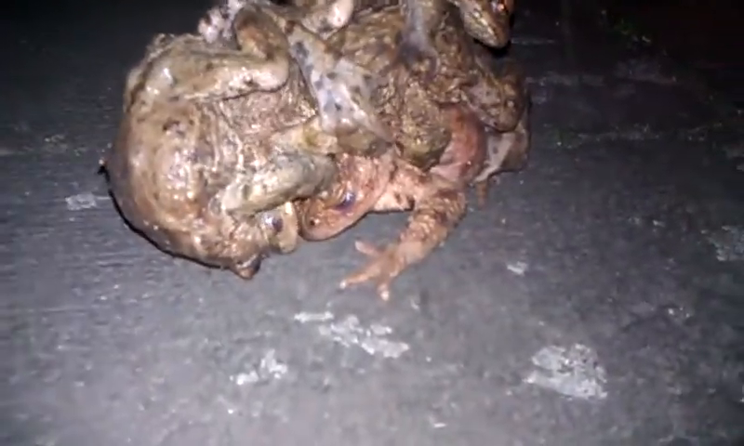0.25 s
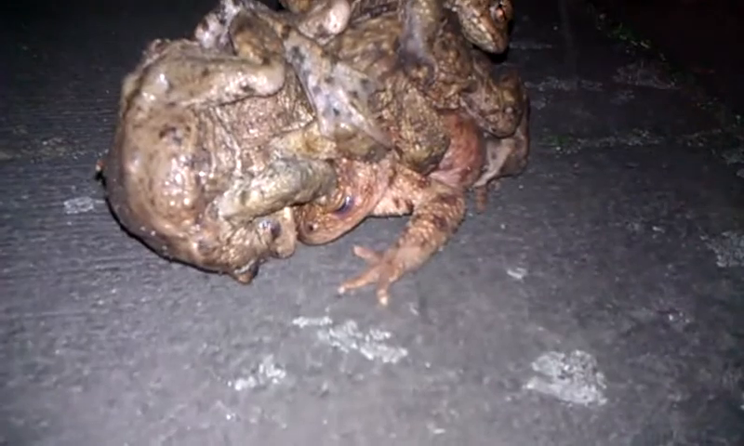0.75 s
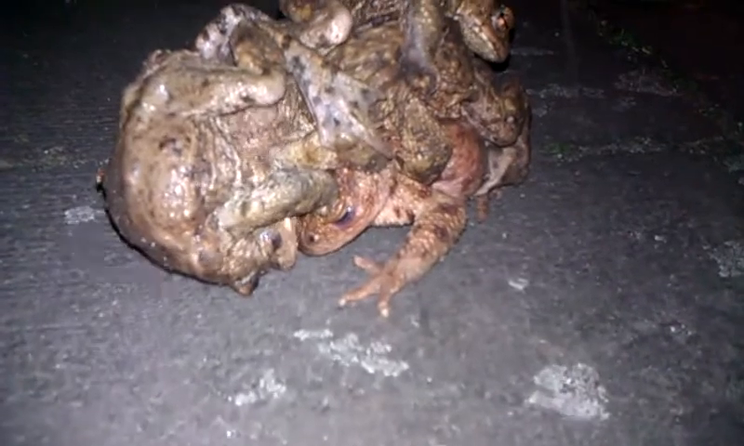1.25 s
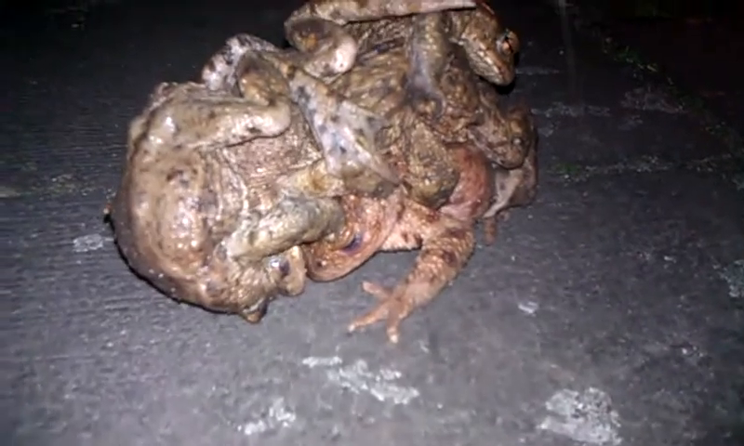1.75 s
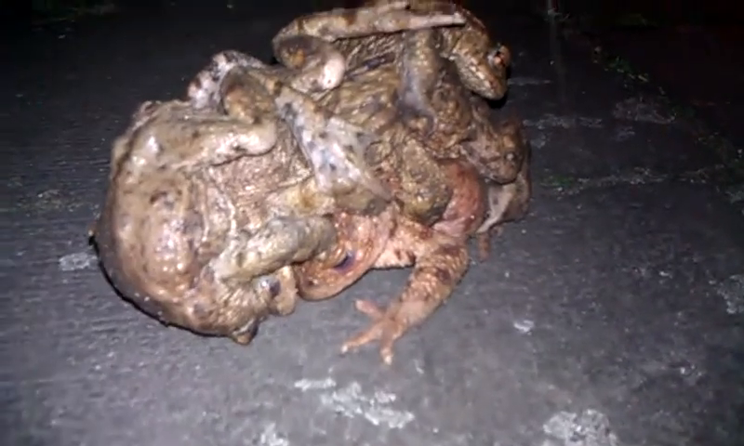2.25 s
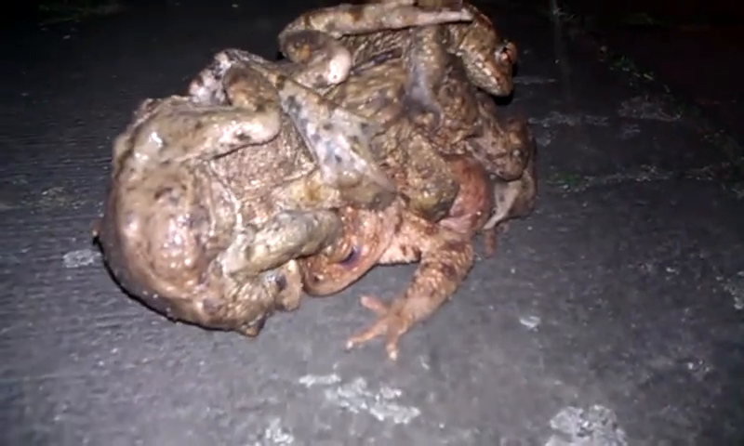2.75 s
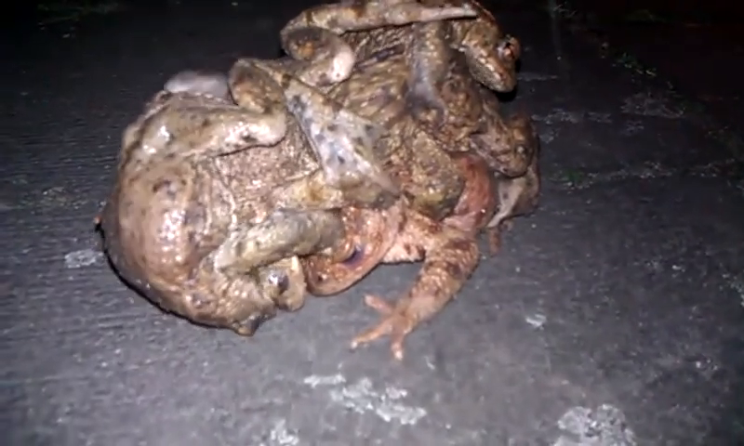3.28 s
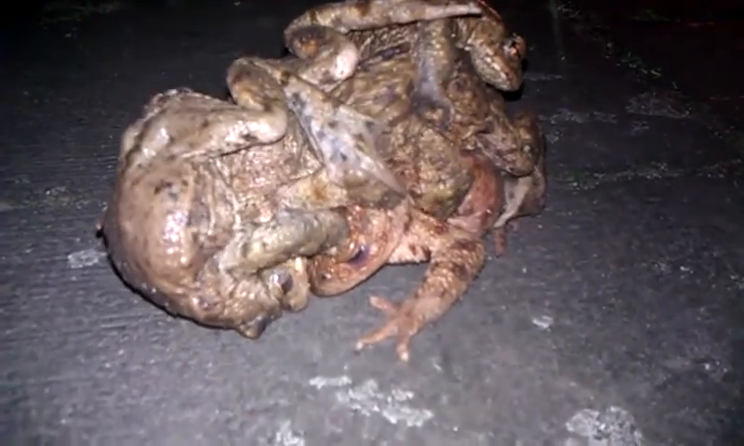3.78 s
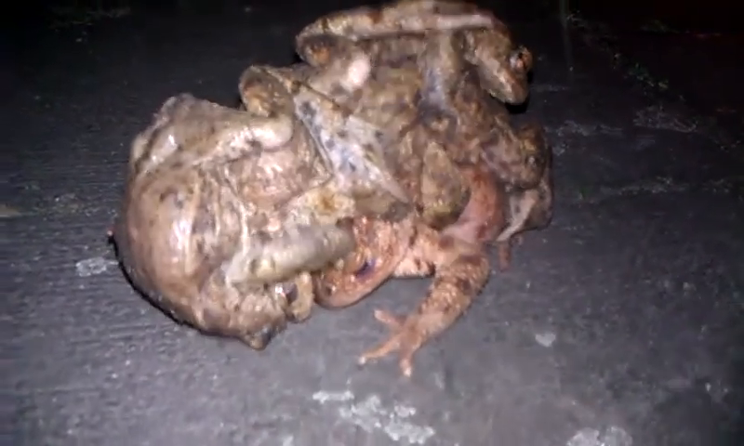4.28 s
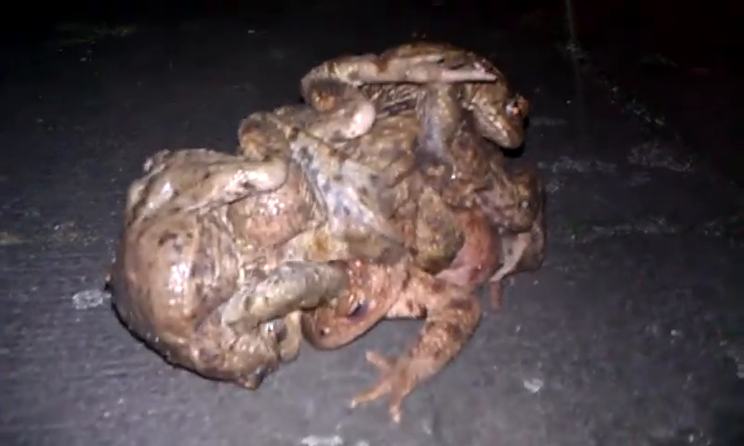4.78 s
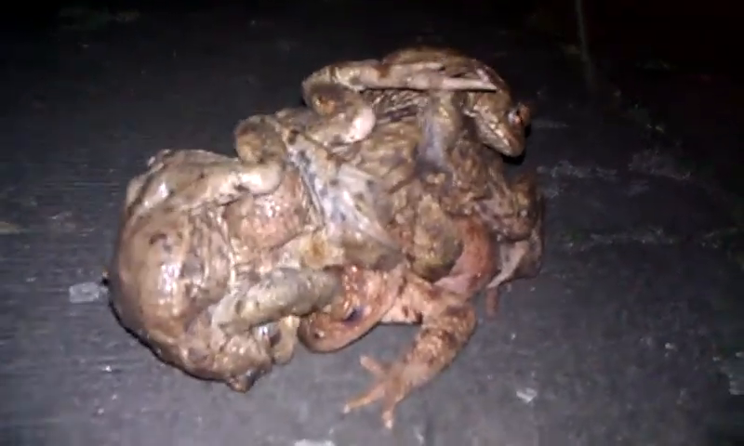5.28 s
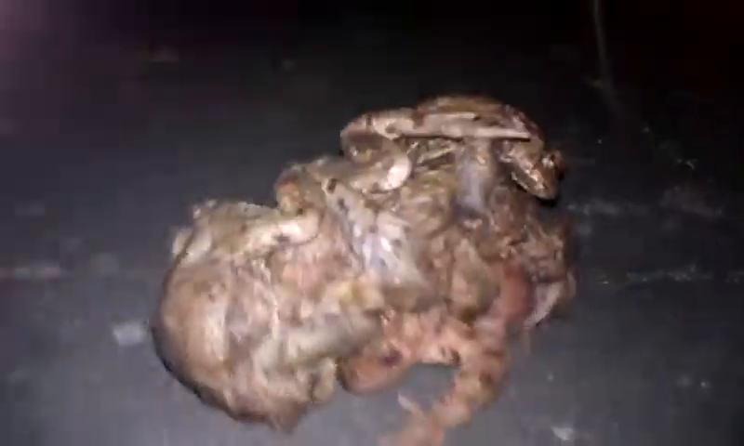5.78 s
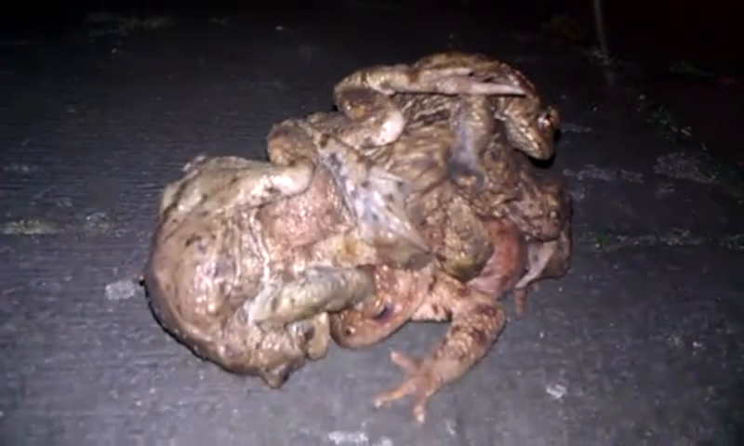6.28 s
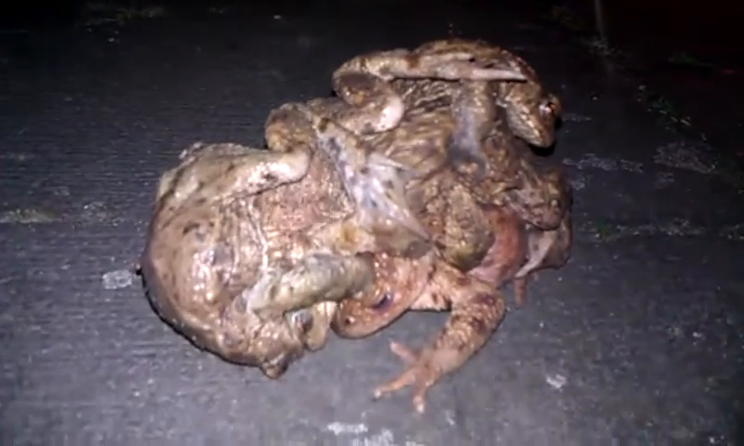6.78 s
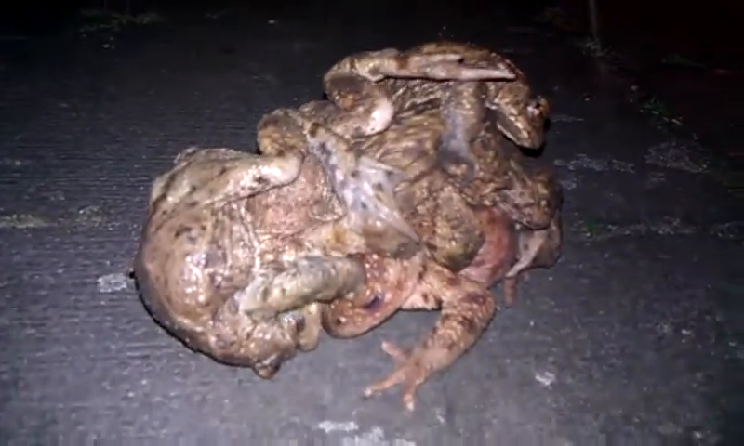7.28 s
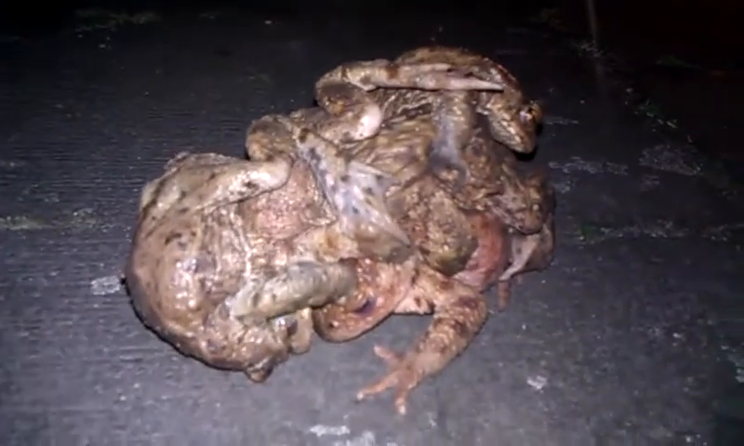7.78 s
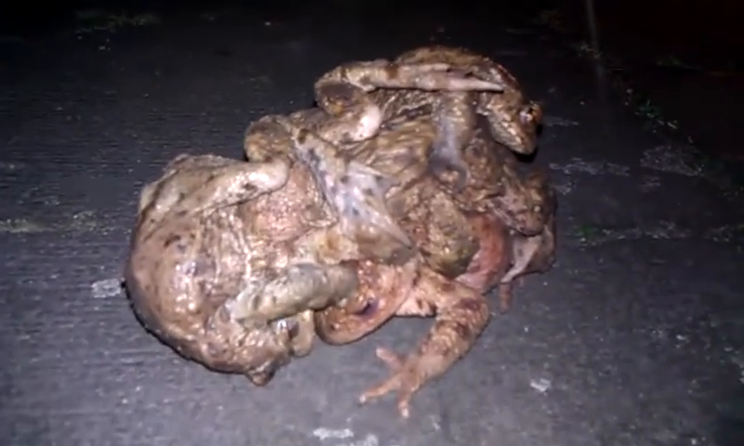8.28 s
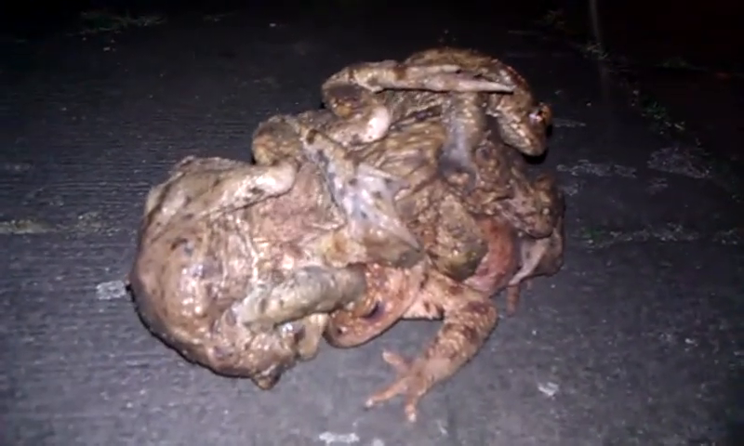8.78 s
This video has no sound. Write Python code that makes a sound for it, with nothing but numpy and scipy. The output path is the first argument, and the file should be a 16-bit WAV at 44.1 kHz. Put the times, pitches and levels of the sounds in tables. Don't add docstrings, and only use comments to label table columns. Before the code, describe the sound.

Quiet outdoor night with faint air hiss and far engine hum. Two pairs of short, croaky toad chirps sound close up, then one smoother, weaker peep. A sole grinds on grit in two bursts, with loud pebble clicks near the end of each part. More paired chirps follow, the second with a longer rattling lead-in. Handheld phone close to the animals, open and nearly dry, essentially mono.

```python
import sys
import numpy as np
from scipy import signal
from scipy.fft import rfft, irfft, next_fast_len
from scipy.io import wavfile
from scipy.ndimage import uniform_filter1d

SR = 44100
rng = np.random.default_rng(int(sys.argv[2]) if len(sys.argv) > 2 else 0)


def transcribe(u):
    v = np.clip(np.atleast_2d(u).T, -1, 1)
    q = np.round(v * 32767).astype(np.int16)
    wavfile.write(sys.argv[1], SR, q)


def volts_from_decibels(level):
    exponent = np.asarray(level, float) / 20
    return 10 ** exponent


N = 399105
T = np.arange(N) / SR

# start_s, peak_db
SNAPS = [(0.9428, -21.3), (0.949, -24.9), (0.9577, -18.7), (0.9649, -17.3), (2.2571, -19.2),
         (2.265, -20.6), (2.2716, -17.5), (2.2799, -18.2), (5.5225, -22.6), (5.5308, -21.8),
         (6.5895, -22.3), (6.5959, -20.5), (6.6034, -19.9), (6.6106, -19.6), (8.6579, -20.4),
         (8.6665, -18.8), (9.0463, -20.9)]
# start_s, peak_db
MORE_SNAPS = [(1.2942, -25.9), (1.2994, -23.3), (1.3042, -20.5), (1.3092, -18.4), (1.3161, -19.5),
              (1.3209, -18.6), (1.3284, -19.5), (1.3357, -19.9), (2.7589, -19.2), (2.764, -17.9),
              (2.7722, -17.4), (2.7777, -17.6), (2.7845, -17.0), (2.7906, -18.1), (5.8747, -23.4),
              (5.8817, -27.3), (5.89, -19.1), (5.8979, -19.9), (5.9053, -19.7), (5.9122, -20.6),
              (6.9579, -26.1), (6.9634, -24.2), (6.9676, -21.0), (6.9729, -21.2), (6.9786, -22.0),
              (6.9838, -19.5), (6.9908, -20.5), (6.9967, -19.7), (7.0037, -20.0)]
# peak_s, peak_db, rise_s, fall_s, fineness_db
SCUFFS = [(4.82, -52, 0.0088, .02, -10), (4.844, -28, 0.015, 0.029, 2), (4.88, -42, 0.036, 0.08, -3),
          (4.98, -48, 0.14, 0.23, -8), (5.07, -46.5, 0.11, .12, -1), (5.17, -50.5, .12, 0.062, -12),
          (5.412, -54.5, 0.021, 0.026, -19), (5.5, -46, 0.026, 0.03, -31), (5.545, -54, 0.12, .05, -20),
          (5.574, -45, .02, 0.016, -28), (5.594, -47.5, .015, 0.017, -9), (5.62, -68, .03, 0.12, -11)]
# time_s, strength_db
GUST = [(0.0, -5), (0.3, -2), (0.9, 3), (1.13, -3.5), (1.94, -4), (4.4, -5), (5.6, 3.5), (6.3, -0.5),
        (7.2, 2.5), (7.7, 2.5), (8.0, 0), (8.77, 4.5), (9.05, 2.5)]


def toads():
    # freq_hz, level_db
    throat = [(2200, -6), (3300, -8), (4400, -9.5), (5500, -18.5), (7600, -19.5), (8700, -22), (9800, -24),
              (10800, -8.5), (12200, -20), (14100, -3.5), (15200, -3), (16300, -5)]
    # freq_hz, level_db
    peeper = [(2300, 1.6), (3450, -3.5), (4600, -19), (6900, -17), (8100, -33), (9200, -4), (11500, -18),
              (13800, -4), (16300, -20)]
    peep_s, start_turn, linger_s, linger_db = 3.72, 0.16, 0.011, -12.5
    (first, low, high, snap), hz = larynx()
    on = np.flatnonzero(first > 1e-5)
    phase = 2 * np.pi * np.cumsum(hz * (1 + .002 * walk(400))) / SR
    snap_s = np.array(sorted(SNAPS + MORE_SNAPS))[:, 0]
    opens = ((snap_s - .0006) * SR).astype(int)
    last = opens[np.maximum(np.searchsorted(opens, on) - 1, 0)]
    phase = phase[on] - phase[last] + 2 * np.pi * start_turn
    keep = np.exp(-1 / (linger_s * SR))
    lingering = volts_from_decibels(linger_db) * signal.lfilter([1 - keep], [1, -keep], low)
    second = np.maximum(low, lingering)[on]
    out = first[on] * np.sin(phase)
    peep = np.abs(T[on] - peep_s) < .1
    for k in range(2, 16):
        f = k * hz[on]
        db = np.where(peep, on_log(f, peeper), on_log(f, throat))
        flutter = 1 + (.03 + .02 * k) * walk(500, size=len(on))
        strength = second if k == 2 else np.where(f < 8200, low[on], high[on])
        out = out + strength * volts_from_decibels(db) * flutter * np.sin(k * phase + 3.0 * (k - 1))
    voice = np.zeros(N)
    voice[on] = out
    air = unit(colour(rng.standard_normal(N), [(1500, -46)] + throat))
    spit = band(rng.standard_normal(N), 1200, 1870)
    for gain, lo_hz, hi_hz in [(0.38, 3200, 5400), (0.26, 9200, 10500), (0.22, 13200, 18000)]:
        spit = spit + gain * band(rng.standard_normal(N), lo_hz, hi_hz)
    return voice + volts_from_decibels(-18) * high * air + (volts_from_decibels(-18.5) * low + volts_from_decibels(-2.5) * snap) * unit(spit)


def larynx():
    # start_s, length_s, top_hz, end_hz, brightness_db
    held_notes = [(0.9703, .0233, 1098, 1060, -10.7), (1.3408, .0312, 1098, 1047, -12.3),
                  (2.2855, .029, 1085, 1067, -5.5), (2.7951, .0286, 1132, 1075, -9.7),
                  (3.7031, .0258, 1144, 1200, -32.8), (5.5375, .0424, 1081, 1093, -20.5),
                  (5.9175, .0342, 1087, 1042, -14.5), (6.6142, .0297, 1103, 1084, -12.5),
                  (7.0089, .0324, 1078, 1042, -16), (8.6725, .0309, 1086, 1066, -18.3),
                  (9.079, .03, 1090, 1060, -17)]
    env, pitch = np.zeros((4, N + SR)), []
    time = np.arange(N + SR) / SR
    snaps = np.array(sorted(SNAPS + MORE_SNAPS))
    for s0, length, hz1, hz2, bright_db in held_notes:
        run = snaps[(snaps[:, 0] < s0) & (snaps[:, 0] > s0 - .1)]
        db1 = run[-1, 1] - 1 if len(run) else -27.5
        note_low_db = -17.5 + 0.22 * (bright_db + 16) if len(run) else -10
        for s, db in run:
            lead_ms = (s0 - s) * 1000
            open_ms = 1.2 + 4.9 * np.exp(-lead_ms / 14)
            hz = 1126.4 + 5.3 * lead_ms
            low_db = db1 + note_low_db + 3.5 - db
            high_db = bright_db + 3 - 0.14 * lead_ms
            a = int((s - .003) * SR)
            shapes = puff((time[a:a + 900] - s) * 1000, open_ms)
            part_db = np.array([[0], [low_db + 1.0], [high_db - .6], [low_db]])
            shapes = shapes * volts_from_decibels(db + 3.3 / open_ms - 1.06 + part_db)
            env[:, a:a + 900] = np.maximum(env[:, a:a + 900], shapes)
            pitch += [(s, hz * (1 + 0.21 / open_ms ** 2)), (s + open_ms / 1000, hz * .97)]
        s1, s2 = s0 + 0.00294, s0 + length
        db0, db2 = db1 + min(-5.5 + .7 * (bright_db + 15), 0), db1 - 8
        if not len(run):
            s1, db0, db2 = s0 + .0016, db1 - 5.5, db1 - 6.5
            pitch += [(s0 - .0016, hz1 * 1.2)]
        a, b = int((s0 - .003) * SR), int((s2 + 0.013) * SR)
        bend_s = [s0 - .003, s0, s1, s2 - .01, s2, s2 + .002, s2 + .005, s2 + .013]
        bend_db = [db0 - 17, db0, db1, db2 + 3.2, db2, db2 - 3.6, db2 - 20, db2 - 46]
        db = np.interp(time[a:b], bend_s, bend_db)
        spent = np.clip((time[a:b] - s1) / (s2 - s1), 0, 1.3) ** 1.9
        spent_db = -34 + 0.17 * (bright_db + 13)
        high_db = bright_db + (spent_db - bright_db) * spent
        parts = volts_from_decibels(db + np.array([0 * db, 0 * db + note_low_db, high_db]))
        env[:3, a:b] = np.maximum(env[:3, a:b], parts)
        middle_hz = hz1 + (.7 if hz2 < hz1 else .05) * (hz2 - hz1)
        pitch += [(s1, hz1), (s1 + 0.402 * (s2 - s1), middle_hz), (s2, hz2)]
    return env[:, :N], np.interp(T, *np.transpose(sorted(pitch)))


def puff(ms, open_ms):
    rise = 1 / (1 + np.exp(-ms / 0.18))
    sag = volts_from_decibels(-3.5 * np.clip(ms / open_ms, 0, 1) ** 2)
    shut = np.maximum(ms - open_ms + 0.37, 0)
    ring = -shut / (0.39 + 0.35 * open_ms)
    low = -(shut + 0.22) / 1.0
    high = -(shut + 0.096) / 0.91
    turbulence = -np.maximum(ms - .6, 0) / 3.15
    return rise * sag * np.exp([ring, low, high, turbulence])


def echo(x):
    s = T[:int(.2 * SR)]
    ground = volts_from_decibels(-54) * np.exp(-s / .008)
    wall = volts_from_decibels(-69) * np.exp(-((s - .088) / 0.019) ** 2)
    response = (ground + wall) * rng.standard_normal(len(s))
    return band(signal.fftconvolve(x, response)[:N], 390, 2300)


def pebbles():
    # start_s, peak_db, ring_hz, thud_db
    stones = [
        (4.813, -28, 5300, -39),
        (4.8319, -11, 6200, -35),
        (5.318, -41.5, 3600, -16),
        (5.4075, -34, 6760, -25),
        (5.4176, -32, 5350, -29),
        (5.4956, -32, 7320, -24),
        (5.5686, -13.5, 5600, -32),
        (5.5862, -20, 6320, -27),
        (5.5898, -7.5, 5320, -20.5),
    ]
    out, s = np.zeros(N + 900), T[:800]
    noise = rng.standard_normal((len(stones), 800))
    for (t, db, hz, thud_db), n in zip(stones, noise):
        ring = band(n * np.exp(-s / 0.0011), hz / 1.183, hz * 1.304, order=3)
        tick = band(n * np.exp(-s / 0.00029), 2560, 9800, order=3)
        body = band(n * np.exp(-s / 0.0006), 500, 2500)
        crack = ring + 0.43 * tick + 0.17 * body
        thud = volts_from_decibels(thud_db) * np.sin(2 * np.pi * 480 * s) * np.exp(-s / .005)
        a = int(t * SR) + 35
        out[a:a + 800] += volts_from_decibels(db - 3.5) * (crack / np.abs(crack).max() + thud)
    return out[:N]


def shoe():
    # freq_hz, density_db
    grains_db = [(2500, -34), (4100, -19), (4700, -6), (5480, -2), (6300, -4), (6850, -8.5), (7700, -12),
                 (9800, -16.5), (10500, -14), (13600, -49)]
    drag_db = swells(SCUFFS)
    dust_db = swells(SCUFFS, more_db=np.array(SCUFFS)[:, 4])
    coarse_db = drag_db - dust_db
    sole_db = -53.5 + 0.9 * (drag_db + 46.5) + 0.38 * (coarse_db - 12)
    crunch = volts_from_decibels(drag_db + 2.6 + 1.4 * walk(150)) * unit(colour(grit(), grains_db))
    fine = volts_from_decibels(dust_db + 2.5 + 0.91 * walk(170)) * unit(band(grit(), 5950, 8900, order=3))
    dust = band(grit(), 10600, 16700, order=4) + 1.1 * band(grit(), 11000, 15400)
    dust = volts_from_decibels(dust_db + 1.5 * walk(150)) * unit(dust)
    sole = volts_from_decibels(sole_db + 2.8 * walk(100)) * unit(band(grit(), 2960, 4500, order=3))
    side = volts_from_decibels(drag_db - 23.5) * unit(band(grit(), 4400, 11800, order=4))
    rub = grit()
    arch_db = drag_db - 3.0 - 0.37 * coarse_db + 2.5 * walk(90)
    arch = volts_from_decibels(arch_db) * unit(band(rub, 5460, 5760))
    stones = volts_from_decibels(drag_db - 20 + 0.76 * coarse_db) * unit(band(rub, 6200, 7600))
    scrape = volts_from_decibels(sole_db - 11) * unit(band(rub, 1900, 2800))
    return arch + stones + scrape + crunch + fine + dust + sole + side * np.array([[1], [-1]])


def grit():
    chance = rng.random((2, N))
    struck = chance[0] < 9000 / SR
    grains = struck * volts_from_decibels(-2.0 * np.log(chance[1])) * rng.standard_normal(N)
    return unit(grains) + 1.2 * rng.standard_normal(N)


def night():
    # freq_hz, density_db
    hiss_db = [(15, -41), (25, -4), (60, -5), (80, -4.5), (118, -3.5), (163, -7.5), (524, -10.5),
               (600, -11), (854, -10), (1470, -16), (1640, -19.5), (1780, -20.5), (7510, -24.5),
               (14800, -27.5), (16500, -22.5)]
    hiss = colour(rng.standard_normal(N), hiss_db)
    hiss = hiss * volts_from_decibels(-59 - 0.1) / np.std(band(hiss, 177, 15300))
    breeze = volts_from_decibels(-66.5 + curve(GUST)) * unit(band(rng.standard_normal(N), 306, 2100, order=3))
    return hiss + breeze + traffic() + leaves() + far_callers()


def traffic():
    # peak_s, peak_db, rise_s, fall_s
    surges = [(0.16, -49, .6, 0.37), (0.7, -57.5, 0.18, 0.18), (1.06, -60, 0.16, .24),
              (1.4, -60, 0.29, 0.74), (2.34, -61, 0.45, 0.53), (3.02, -48.5, .4, 0.23),
              (3.33, -55, .22, 0.28), (4.03, -64, 0.35, 0.33), (5.06, -70, 0.43, 0.35),
              (6.07, -62.5, 1.3, 1.5), (9.05, -61.5, 3.2, .5)]
    # time_s, pitch_hz
    engine_hz = [(0, 57.5), (1.3, 57), (3.05, 57.3), (3.3, 61.9), (4.66, 60.9), (4.85, 57), (6.07, 56.7),
                 (7.8, 54), (9.05, 52.8)]
    # peak_s, peak_db, rise_s, fall_s
    passes = [
        (0.0, -57.5, .3, 0.5),
        (1.06, -65, .3, 0.25),
        (3.4, -58.5, 0.57, 1),
        (4.18, -61, 0.44, .5),
        (4.95, -60, .5, 0.79),
        (7.5, -61.5, 3.0, 1),
        (9.05, -57, 2.54, .5),
    ]
    hz = curve(engine_hz) + 1.43 * walk(13)
    hum = np.sqrt(2) * np.sin(2 * np.pi * np.cumsum(hz) / SR)
    hum = volts_from_decibels(swells(surges, rest_db=-73) + 2.0 * walk(9)) * hum
    rumble = unit(band(rng.standard_normal(N), 95, 155.6))
    return hum + volts_from_decibels(swells(passes, rest_db=-69) - 4.5) * rumble


def leaves():
    # start_s, peak_db, pitch_hz
    scrapes = [
        (3.2494, -49.5, 5900),
        (7.72, -52, 5880),
        (7.92, -60, 5750),
        (8.3414, -46.5, 6050),
    ]
    settle_s = 0.97
    stir_db = -69.5 + 0.86 * uniform_filter1d(curve(GUST), int(settle_s * SR))
    out = volts_from_decibels(stir_db + 0.79 * walk(22)) * unit(band(rng.standard_normal(N), 4640, 7120))
    for s, db, hz in scrapes:
        swell = np.exp(-((T - s - .03) / 0.047) ** 2)
        scrape = unit(band(rng.standard_normal(N), hz / 1.06, hz * 1.06))
        out = out + volts_from_decibels(db - 14.5) * swell * scrape
    return out


def far_callers():
    # peak_s, peak_db, rise_s, fall_s, pitch_hz
    trills = [(0.41, -67, 0.066, .06, 3200), (0.46, -63, 0.046, .05, 3150), (0.515, -61, .06, .05, 3280),
              (0.62, -72, .1, 0.12, 3180), (0.78, -65, 0.17, 0.14, 3240), (0.5, -68, .15, .12, 5150),
              (0.76, -67.5, .12, .12, 5470), (0.44, -61, .12, .06, 1130), (0.77, -61.5, 0.14, 0.086, 1565),
              (0.86, -61, .08, .05, 1620), (5.36, -65, 0.17, 0.16, 1500),
              (6.462, -55.5, 0.016, 0.017, 1284)]
    noise, width = rng.standard_normal(N), 0.06
    out = np.zeros(N)
    for row in trills:
        hz = row[4]
        line = unit(band(noise, hz * (1 - width / 2), hz * (1 + width / 2)))
        out = out + volts_from_decibels(swells([row])) * line
    return out


def swells(rows, rest_db=-120, more_db=0):
    power = np.full(N, volts_from_decibels(rest_db) ** 2)
    for row, extra_db in zip(rows, np.broadcast_to(more_db, len(rows))):
        s, db, rise_s, fall_s = row[:4]
        near = slice(max(int((s - 3 * rise_s) * SR), 0), int((s + 3 * fall_s) * SR))
        before = (s - T[near]) / max(rise_s, .001)
        after = (T[near] - s) / max(fall_s, .001)
        away = np.where(T[near] < s, before, after)
        power[near] += volts_from_decibels(db + extra_db - 20 * away ** 1.5) ** 2
    return 10 * np.log10(power)


def curve(table):
    return np.interp(T, *np.transpose(table))


def walk(rate, size=N):
    k = max(int(SR / rate), 1)
    held = np.repeat(rng.standard_normal(size // k + 1), k)
    return 1.3 * uniform_filter1d(uniform_filter1d(held, k), k)[:size]


def colour(x, table):
    size = next_fast_len(N)
    hz = np.arange(size // 2 + 1) * SR / size
    return irfft(rfft(x, size) * volts_from_decibels(on_log(hz, table)), size)[:N]


def on_log(hz, table):
    f, db = np.transpose(table)
    return np.interp(np.log(np.maximum(hz, 1)), np.log(f), db)


def band(x, lo_hz, hi_hz, order=2):
    sos = signal.butter(order, [lo_hz, min(hi_hz, .45 * SR)], "band", fs=SR, output="sos")
    return signal.sosfilt(sos, x)


def unit(x):
    return x / np.sqrt(np.mean(x ** 2))


def scene():
    voice = toads()
    loud_db = np.clip(swells(SCUFFS) + 46, 0, 20)
    duck = volts_from_decibels(-.6 * uniform_filter1d(loud_db, size=1600))
    return voice + echo(voice) + pebbles() + duck * night() + shoe()


def low_pass(x):
    return signal.sosfilt(signal.butter(12, 16970, fs=SR, output="sos"), x)


def record(dry):
    cut = signal.ellip(8, .2, 22, 16000, fs=SR, output="sos")
    mix = signal.sosfilt(cut, dry)
    return low_pass(mix)


dry = scene()
out = record(dry)
transcribe(out)
```